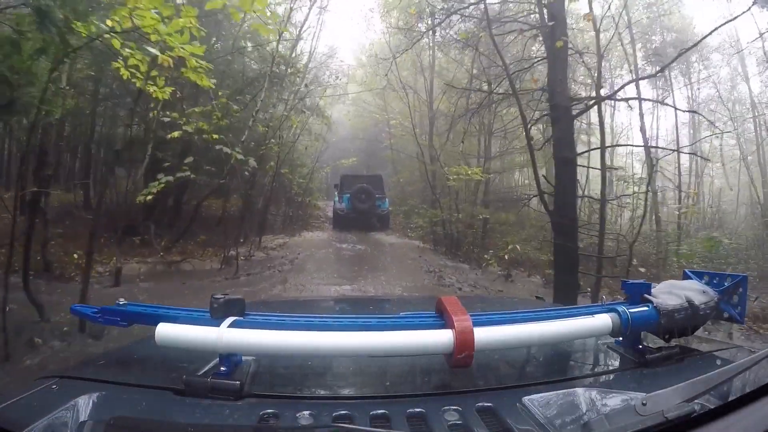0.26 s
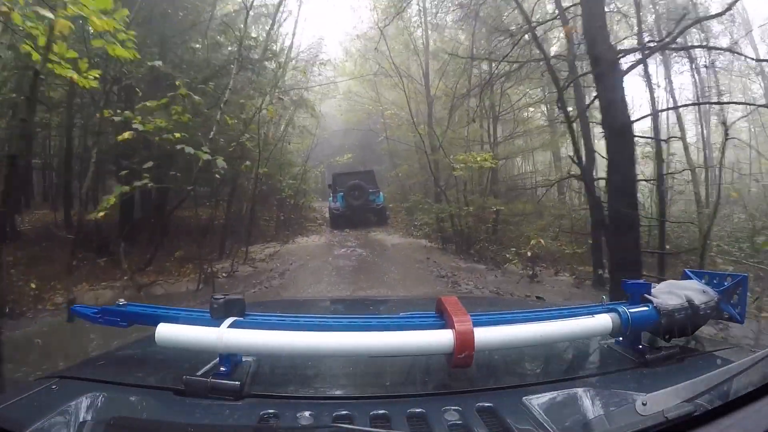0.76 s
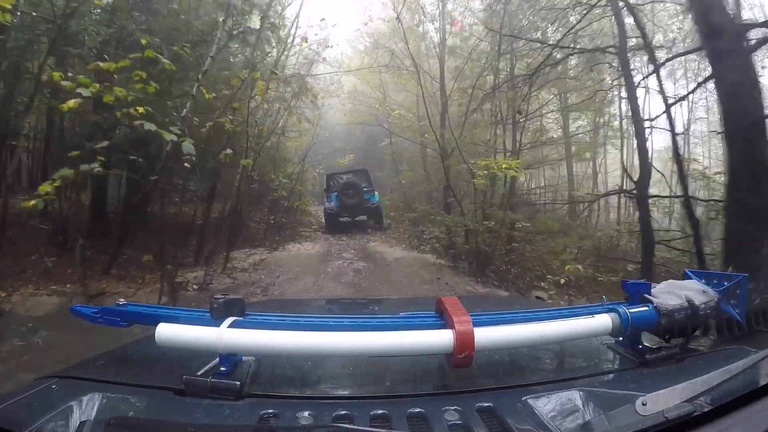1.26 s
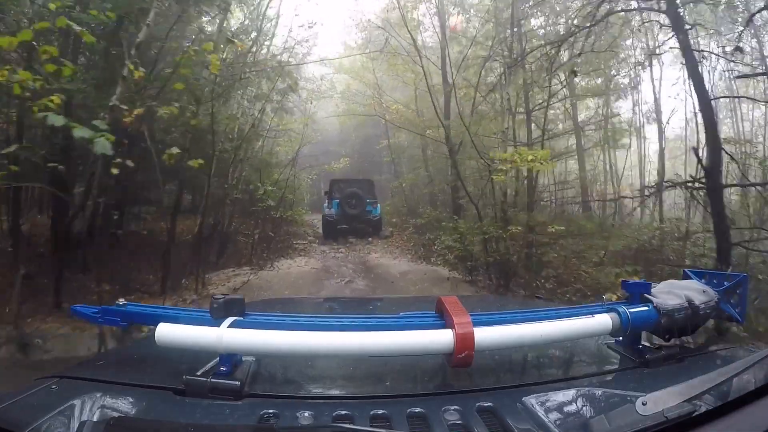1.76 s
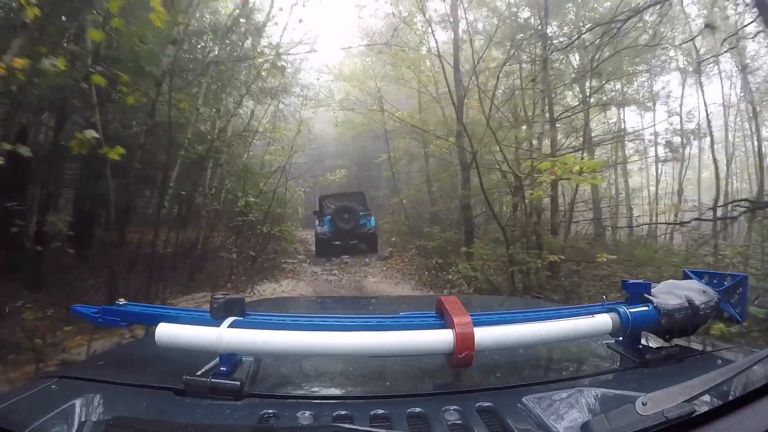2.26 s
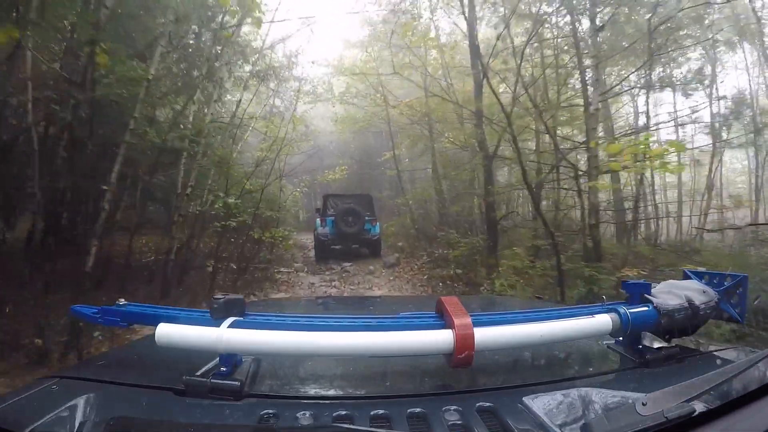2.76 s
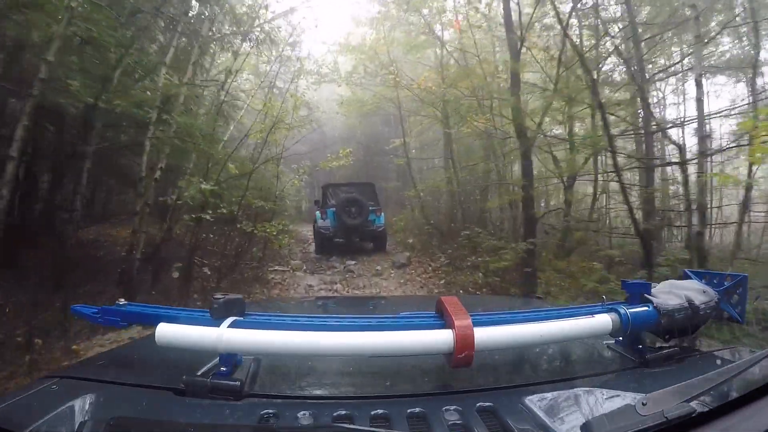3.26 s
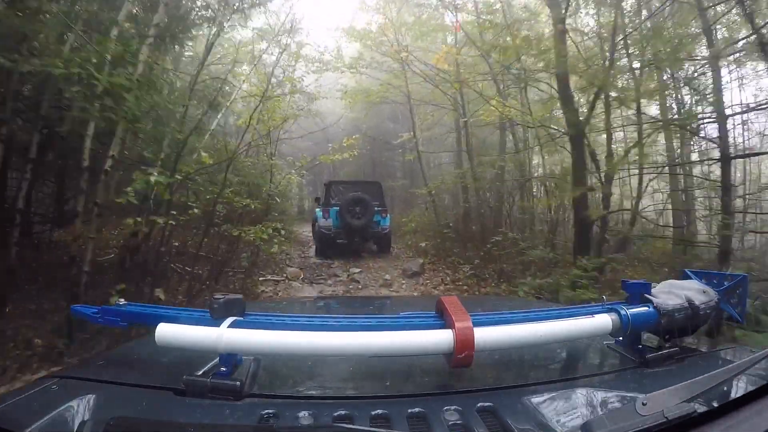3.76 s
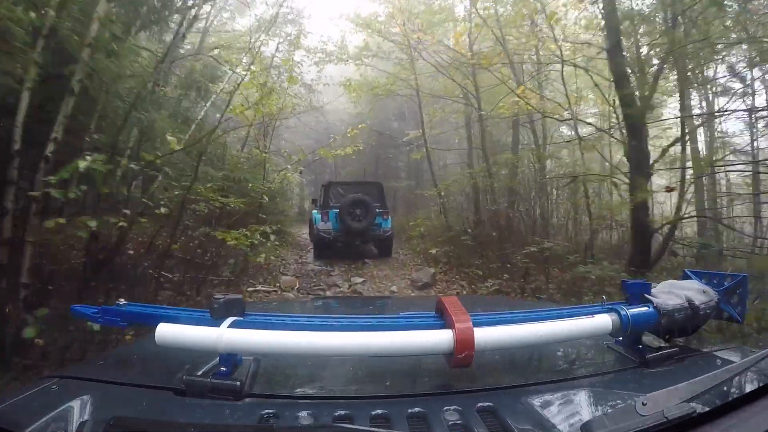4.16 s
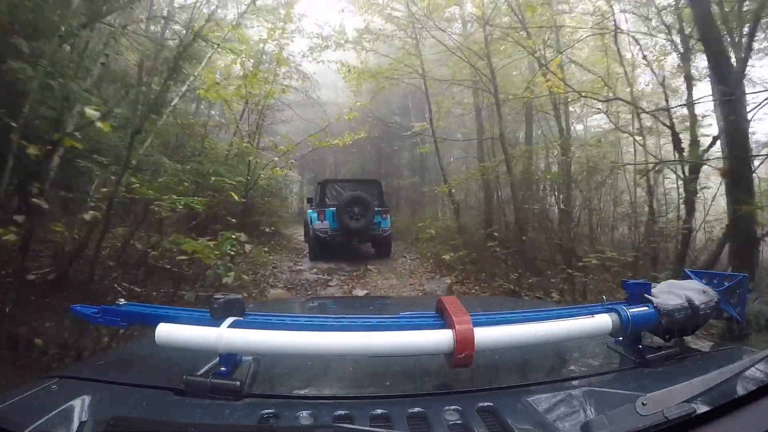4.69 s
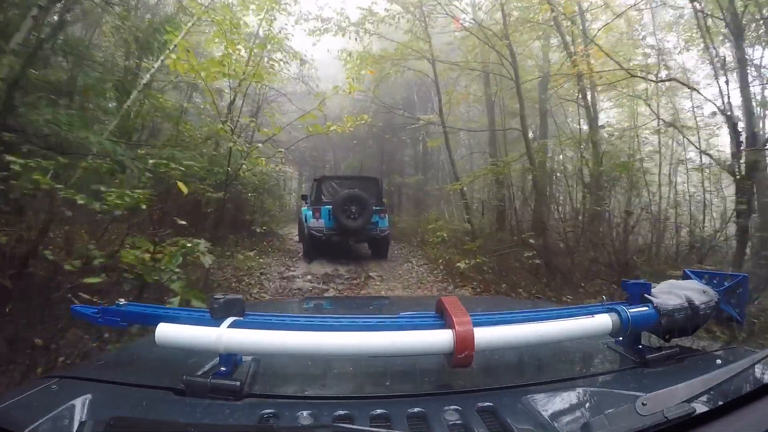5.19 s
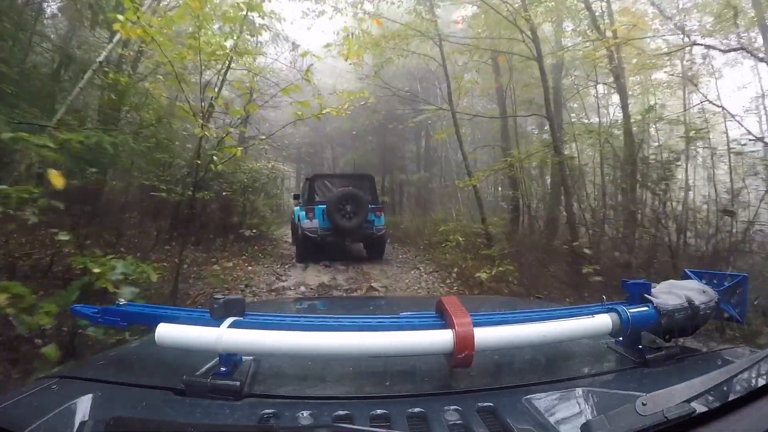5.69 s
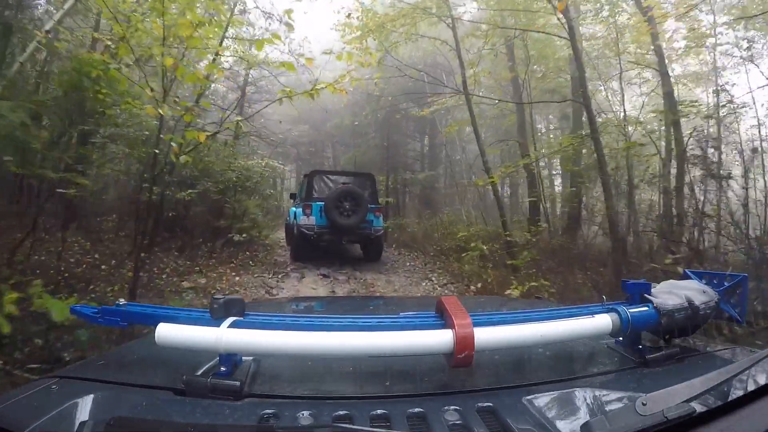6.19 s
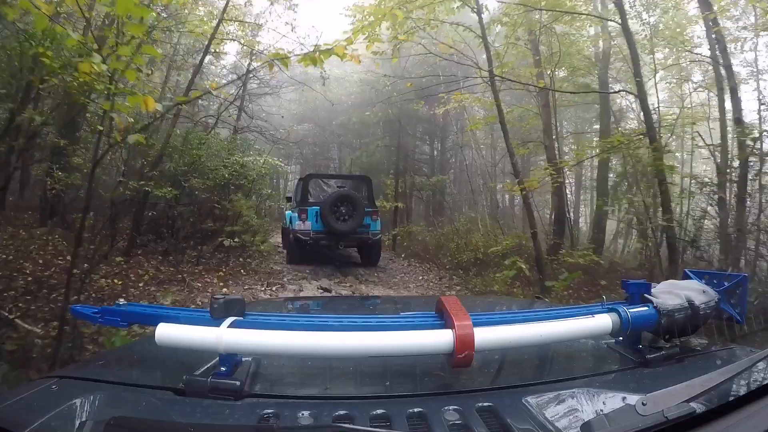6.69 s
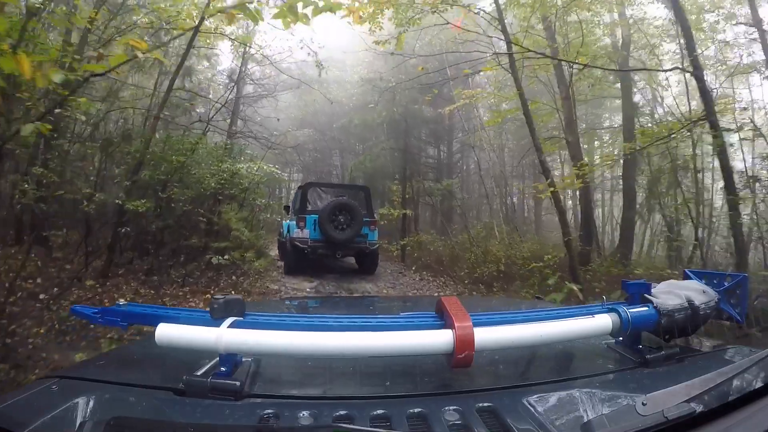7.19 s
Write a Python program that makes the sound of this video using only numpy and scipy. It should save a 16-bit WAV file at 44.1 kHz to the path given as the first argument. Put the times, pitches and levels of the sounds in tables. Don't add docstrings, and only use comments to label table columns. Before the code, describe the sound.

Low engine and booming body rumble as a four-wheel drive wades a flooded trail, water sloshing and spraying, then thinning to drips and gurgles.

```python
import sys
import numpy as np
from scipy import signal
from scipy.fft import rfft, irfft
from scipy.io import wavfile
from scipy.ndimage import uniform_filter1d

SR = 44100
rng = np.random.default_rng(int(sys.argv[2]) if len(sys.argv) > 2 else 0)


def wav_out(sig):
    wavfile.write(sys.argv[1], SR, np.round(np.clip(np.atleast_2d(sig).T, -1, 1) * 32767).astype(np.int16))


def undo_db(level):
    steps = np.asarray(level, float) / 20
    return 10 ** steps


N = 328104


def evened(x):
    return x / np.sqrt(np.mean(x ** 2) + 1e-20)


def curves(rows):
    s, *columns = np.transpose(rows)
    return [np.interp(np.arange(N) / SR, s, column) for column in columns]


def swell(s, width):
    return np.maximum(1 - abs(np.arange(N) / SR - s) / width, 0)


def add(mix, s, sound):
    part = mix[round(s * SR):][:len(sound)]
    part += sound[:len(part)]


def coloured(x, points):
    hz, db = np.transpose(points)
    bins_hz = np.fft.rfftfreq(N, 1 / SR)
    gain = undo_db(np.interp(np.log(bins_hz + 1), np.log(hz), db))
    return evened(irfft(rfft(x) * gain, N))


def drift(rate_hz):
    lowpass = 1 / (1 + (np.fft.rfftfreq(N, 1 / SR) / rate_hz) ** 4)
    return evened(irfft(rfft(rng.standard_normal(N)) * lowpass, N))


def tone(hz, waver, flutter_db, rate_hz=4.7):
    turns = np.cumsum(hz * (1 + waver * drift(rate_hz))) / SR
    return evened(undo_db(flutter_db * drift(rate_hz)) * np.sin(2 * np.pi * turns))


def body():
    # peak_s [s], swing_db [dB], pitch_hz [Hz], swell_s [s]
    bounces = [(.1, -18, 19, 0.24), (.43, -12.5, 24.2, 0.35), (.69, -15, 25.5, .09), (1.0, -16, 24, .1),
               (1.25, -11.5, 21.8, 0.21), (1.51, -15, 25.7, 0.11), (1.71, -13.5, 23, 0.079),
               (1.88, -12, 23, 0.12), (2.15, -18, 24.4, 0.18), (2.39, -13.5, 23.3, 0.089),
               (2.68, -16, 24, 0.16), (2.87, -12.5, 27, .1), (3.06, -18.5, 20.7, 0.092),
               (3.25, -18.5, 23.8, 0.16), (3.51, -25, 24.6, 0.22), (3.72, -26, 25.4, 0.071),
               (3.85, -19.5, 27, .1), (4.13, -17, 31, .12), (4.83, -16.5, 27.6, .16), (5.01, -17, 25.6, .1),
               (5.18, -21, 24.6, 0.065), (5.49, -22.5, 23.3, 0.16), (5.72, -14.5, 24.8, .11),
               (5.87, -15, 21.7, 0.11), (6.12, -18, 21.2, 0.13), (6.38, -21, 25.6, 0.14),
               (6.57, -16.5, 21.7, 0.14), (6.97, -13, 25.8, 0.15), (7.11, -15, 23.6, .12),
               (7.32, -13, 24.2, 0.11)]
    # peak_s [s], swing_db [dB], pitch_hz [Hz], swell_s [s]
    booms = [(0., -11.5, 35.6, 0.14), (.3, -20, 36.7, 0.21), (.66, -14, 34.9, 0.15), (.9, -11, 35.77, .1),
             (1.08, -17, 35.5, 0.15), (1.24, -14.5, 37.04, 0.064), (1.42, -14.5, 36.3, 0.13),
             (1.62, -11.5, 36.08, 0.051), (1.85, -15.5, 35.95, 0.18), (2.01, -11.5, 33.9, .14),
             (2.25, -18, 36.66, 0.12), (2.47, -12, 37.2, 0.11), (2.73, -12.5, 34.8, 0.18),
             (3.11, -13.5, 34.86, 0.14), (3.33, -12.5, 35.2, 0.073), (3.6, -13, 33.17, .2),
             (4., -15, 35.8, 0.057), (4.23, -16.5, 34.33, 0.11), (4.43, -14, 33.54, .12),
             (4.64, -15.5, 34.54, 0.16), (4.95, -15.5, 34.83, 0.17), (5.2, -16, 36.1, 0.098),
             (5.61, -16.5, 35.99, .12), (5.95, -14, 36.37, 0.23), (6.23, -18.5, 34.73, .09),
             (6.54, -19.5, 36.6, 0.12), (6.8, -16, 35.74, 0.13), (7., -15.5, 35.78, .11),
             (7.15, -19, 34.6, 0.048), (7.34, -20, 36.27, 0.08)]
    # freq_hz [Hz], density_db [dB per Hz]
    frame_colour = [(10, 0), (20, -4), (45, 0), (62, 1.5), (78, -4), (100, -25.5), (134, -15.5),
                    (160, -24.5), (220, -29), (400, -70)]
    rumble_db = -29.5 - 3.5 * swell(4.2, 2.1)
    rumble = undo_db(rumble_db) * coloured(rng.standard_normal(N), frame_colour)
    return mode(bounces, rest_db=-35.5) + mode(booms, rest_db=-32) + rumble


def mode(jolts, rest_db):
    jolt_power = sum((undo_db(db) * swell(s, width)) ** 2 for s, db, hz, width in jolts)
    swing = np.sqrt(undo_db(rest_db) ** 2 + jolt_power)
    pitch_hz = curves([(s, hz) for s, db, hz, width in jolts])[0]
    return swing * tone(pitch_hz, waver=0.036, flutter_db=1.07, rate_hz=9.4)


def engine():
    # time_s [s], firing_hz [Hz], load_db [dB]
    throttle = [(0, 69.7, -7), (.8, 77.3, -8), (2.3, 89.4, -1), (2.75, 84.66, -6), (2.95, 78.06, 3),
                (3.1, 73.3, -1.5), (3.25, 66.9, -4.5), (3.4, 64.9, 2), (3.7, 60.35, -4), (3.85, 58.86, 2.5),
                (4.15, 54.97, -5.5), (4.3, 54.1, -6), (4.5, 53.15, -8), (5.1, 50.95, -4), (5.5, 52.3, -6.5),
                (6.5, 49.24, -4), (7.1, 48.5, -5), (7.44, 50.9, 2.5)]
    # freq_hz [Hz], gain_db [dB]
    exhaust = [(48, -26), (60, -24.5), (66, -23), (73, -29.5), (80, -43), (89, -48)]
    t = np.arange(N) / SR
    hz, load_db = curves(throttle)
    exhaust_db = np.interp(hz, *np.transpose(exhaust))
    firing = undo_db(load_db + exhaust_db) * tone(hz, waver=0.0069, flutter_db=1.1, rate_hz=13.4)
    half_db = -30 + 0.08 * (hz - 50)
    half = undo_db(half_db) * tone(hz / 2, waver=0.01, flutter_db=-2.0)
    fan_hz = 129.1 + 1.4 * t
    fan_db = -45 - 8 * swell(0, 1.26) - 0.5 * t
    fan = undo_db(fan_db) * tone(fan_hz, waver=0.0037, flutter_db=3.0, rate_hz=17.0)
    return firing + half + fan


def water():
    # time_s [s], depth_db under the floor [dB], thrown_db upward [dB]
    wading = [(0, -37, -41), (.5, -34, -40.5), (1, -34, -38), (1.6, -32, -36), (2.35, -30.5, -34),
              (2.65, -32, -35.5), (3.3, -32.5, -35.5), (3.55, -34, -38), (4, -38, -41.5),
              (4.35, -39.5, -42), (4.95, -45.5, -45.5), (5.4, -43.5, -49), (5.85, -43.5, -44.5),
              (6.1, -45.5, -46), (6.55, -48, -47.5), (6.8, -44.5, -49.5), (7.05, -48.5, -53),
              (7.44, -46, -52)]
    # peak_s [s], song_db [dB], gurgle_db [dB], swell_s [s]
    drains = [
        (4.65, 2, 1.5, .2),
        (5.08, 9.5, 0, 0.099),
        (5.32, 1, 4.5, 0.098),
        (5.72, 6, 2.5, 0.37),
        (6.7, -1, 1.5, 0.35),
        (7.3, -6, 0, 0.45),
    ]
    # freq_hz [Hz], density_db [dB per Hz]
    slosh_colour = [(60, -16), (110, -0.5), (184, -2), (291, -0.5), (513, 1.5), (620, -5.5), (748, 0.5),
                    (1000, -12.5), (1600, -25), (3000, -51)]
    # freq_hz [Hz], density_db [dB per Hz]
    churn_colour = [(300, -27), (650, -11.5), (900, -1), (1150, -2.5), (1350, -3), (1700, -4.5),
                    (2270, -9.5), (3200, -16), (6000, -31.5)]
    # freq_hz [Hz], density_db [dB per Hz]
    spray_colour = [(900, -47), (1800, -10), (2860, -2.5), (4400, -4), (5500, -8), (8000, -10.5),
                    (11400, -14.5), (15000, -20.5), (20000, -32)]
    slosh_db, churn_db = curves(wading)
    song_db = sum(db * swell(s, width) for s, db, _, width in drains)
    gurgle_db = sum(db * swell(s, width) for s, _, db, width in drains)

    slosh = patchy(2048, patchy_db=0.7, flicker_db=-0.1)
    slosh = slosh + 0.17 * grains(180.9, 899, 9.6, 400, spread_db=1.14)
    slosh = undo_db(slosh_db) * coloured(slosh, slosh_colour)

    churn = patchy(512, patchy_db=0.9, flicker_db=1.1)
    churn = churn + 0.19 * grains(803.2, 3026, 29.0, 600, spread_db=1.5)
    churn = undo_db(churn_db + gurgle_db) * coloured(churn, churn_colour)

    fizz = patchy(256, patchy_db=0.75, flicker_db=0.54)
    fizz = fizz + 0.26 * grains(2555, 13880, 30.7, 2000, spread_db=3.0)
    spray_gain = undo_db(-45.5 + 1.1 * (churn_db + 40.5)) + undo_db(-69)
    fizz = spray_gain * coloured(fizz, spray_colour)

    arch_hz = 1150
    arch_band = [(arch_hz * 0.81, -40), (arch_hz * 0.943, -3), (arch_hz * 1.026, -3), (arch_hz * 1.16, -40)]
    arch_db = -51.5 + 0.49 * (slosh_db + 39.5) + song_db
    hollow = undo_db(arch_db) * coloured(patchy(512, patchy_db=-3.5, flicker_db=0.7), arch_band)
    return slosh + churn + fizz + hollow


def patchy(size, patchy_db, flicker_db):
    frames = 4 * N // size + 5
    a, b, patches = rng.standard_normal((frames, size // 2 + 1, 3)).T
    patches = uniform_filter1d(patches, size=5, axis=0)
    patches = evened(uniform_filter1d(patches, size=20, axis=1))
    bursts = rng.exponential(1, frames) ** 2 - 2
    flicker = evened(signal.lfilter([1], [1, -.88], bursts))
    z = (a + 1j * b) * undo_db(patchy_db * patches + flicker_db * flicker)
    return evened(signal.istft(z, nperseg=size, noverlap=3 * size // 4)[1][:N])


def grains(low_hz, high_hz, cycles, per_s, spread_db, count=11):
    size = undo_db(spread_db * np.minimum(rng.exponential(1, N), 5))
    size = size * (rng.random(N) < per_s / SR)
    kind = rng.integers(0, count, N)
    out = np.zeros(N)
    for k, hz in enumerate(np.geomspace(low_hz, high_hz, count)):
        bubble = blip(hz, cycles) / np.sqrt(cycles / hz)
        out += signal.oaconvolve(size * (kind == k), bubble)[:N]
    return evened(out)


def blip(hz, cycles, rise=0.159):
    u = np.arange(0, 1.5, hz / cycles / SR)
    ring = np.sin(2 * np.pi * cycles * (u + rise * u ** 2 / 2))
    return ring * (1 - np.exp(-u / 0.11)) * np.exp(-u / 0.33) * 1.49


def drops():
    # start_s [s], peak_db [dB], centre_hz [Hz], length_ms [ms]
    ticks = [(3.405, -29, 9000, 2.3), (4.046, -18.5, 3820, 1.7), (4.557, -29, 9500, 3.14),
             (4.559, -29, 6550, 2), (5.84, -41, 10250, 5), (5.9, -43, 10490, 6), (6.018, -42, 12500, 3.04),
             (6.418, -39, 12000, 2.5), (3.407, -36, 13000, 2.5), (6.413, -36, 4003, 4.4),
             (6.45, -40, 4510, 4.05), (6.487, -46, 9000, 4), (6.53, -44, 8970, 4), (7.309, -44, 10020, 3.5)]
    # start_s [s], peak_db [dB], pitch_hz [Hz], cycles [count]
    gulps = [(.037, -19, 820, 3.4), (0.822, -19, 72, 8), (1.069, -29, 300, 14), (1.13, -22, 67.8, 8.9),
             (2.09, -25, 125, 8.8), (2.3, -27, 128, 15), (2.955, -20.5, 75.8, 13), (2.99, -29, 105, 6.5),
             (3.0, -30, 270, 12), (1.45, -32, 105, 9.4), (4.61, -39, 1160, 60), (6.88, -35, 141.2, 16),
             (1.585, -27.5, 184, 16), (2.033, -25, 440, 4.7), (2.238, -25, 415, 4.5),
             (2.439, -20, 501, 8.4), (3.03, -26, 173, 13.7), (3.895, -34, 1890, 15), (5.07, -38, 1388, 33),
             (5.645, -38, 1130, 60), (5.759, -32, 1308, 25), (6.158, -36, 947, 8), (6.187, -32, 882, 7.8),
             (6.3086, -22, 898, 2.5), (6.589, -33, 478, 5.06), (7.019, -28, 863, 2.9),
             (7.31, -41, 1150, 16)]
    # start_s [s], level_db [dB], centre_hz [Hz], width [octaves], decay_ms [ms]
    splashes = [(2.1, -46, 7990, 1.5, 60), (2.33, -39, 6000, 2.8, 60), (3.339, -43, 9000, 1.3, 30),
                (3.395, -38.5, 8020, 2.7, 40), (4.045, -41, 6000, 2.24, 8), (4.59, -45, 3201, 0.61, 37),
                (4.688, -43.5, 3507, .8, 52), (5.33, -53, 4496, 1.5, 42), (5.79, -44.5, 2989, 1.36, 36),
                (5.81, -52, 8050, .8, 25), (5.835, -53, 9950, 0.57, 18.5), (5.974, -46, 4000, 1.68, 22),
                (6.005, -51, 9500, 0.58, 28.5), (6.13, -50, 7000, 1.27, 29.6), (6.175, -45, 3000, 2.74, 24),
                (6.349, -47, 4504, 2.4, 18.8), (6.411, -46, 3496, 3.4, 14), (6.447, -42, 3000, 2.4, 12),
                (6.48, -47, 4500, 3.26, 14.2), (6.522, -46, 4002, 3, 22), (6.55, -46, 1895, 0.91, 39.4),
                (6.605, -54, 8504, 0.81, 15), (6.75, -54, 3700, 0.55, 39), (7.18, -56, 7442, 1.6, 40.4)]
    out = np.zeros(N)
    for s, db, hz, ms in ticks:
        add(out, s, undo_db(db) * blip(hz, hz * ms / 2000, rise=-0.16))
    for s, db, hz, cycles in gulps:
        add(out, s, undo_db(db) * blip(hz, cycles))
    for s, db, hz, octaves, ms in splashes:
        add(out, s, undo_db(db) * splash(hz, octaves, ms))
    return out


def splash(hz, octaves, ms, size=8192):
    t_ms = np.arange(size) * 1000 / SR
    octaves_off = np.log2(np.fft.rfftfreq(size, 1 / SR) / hz + 1e-3)
    bell = np.exp(-4 * (octaves_off / octaves) ** 2)
    noise = evened(irfft(rfft(rng.standard_normal(size)) * bell))
    return noise * (1 - np.exp(-t_ms / 0.99)) * np.exp(-t_ms / ms)


def spatter():
    shower = np.sqrt(swell(6.25, 0.6))
    return undo_db(-58) * shower * grains(1500, 11000, 7., per_s=260, spread_db=1.5)


def wind():
    colour = [(50, -24), (95, 2.0), (170, -9.0), (280, -6.5), (400, -21), (900, -54)]
    level_db = -48 - 0.27 * np.arange(N) / SR + 6.5 * swell(6.9, 0.55)
    lumps = undo_db(level_db + 3.8 * drift(6.6))
    return lumps * coloured(rng.standard_normal(N), colour)


def scene():
    return (body() + engine() + water() + drops() + spatter() + wind())[None]


def band_limit(x):
    return signal.sosfilt(signal.butter(12, 15240, fs=SR, output="sos"), x)


def record(dry):
    stop = np.minimum(np.arange(N)[::-1] / 300, 1)
    mix = 0.95 * np.tanh(dry / 0.9) * stop
    return band_limit(mix)


dry = scene()
out = record(dry)
wav_out(out)
```